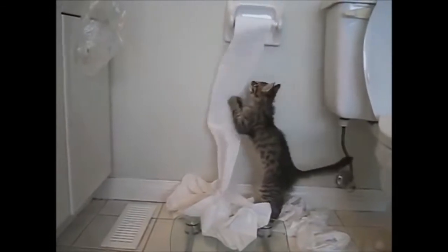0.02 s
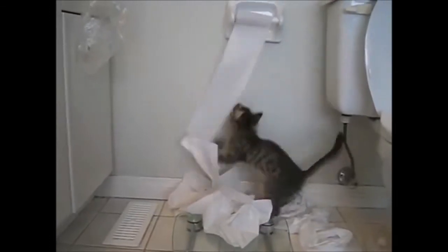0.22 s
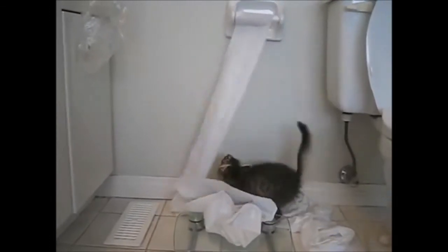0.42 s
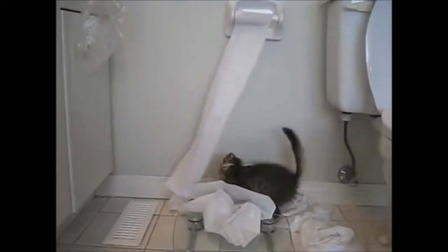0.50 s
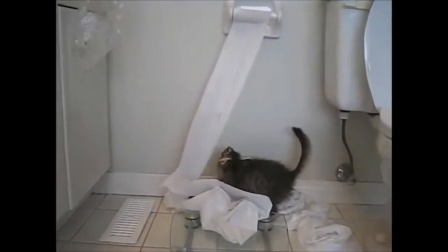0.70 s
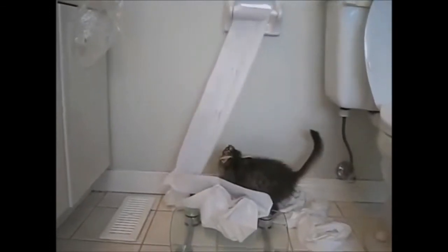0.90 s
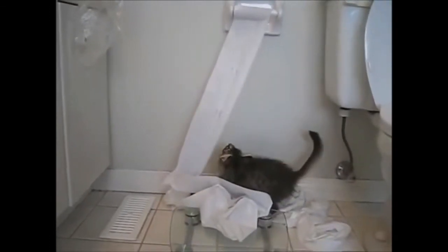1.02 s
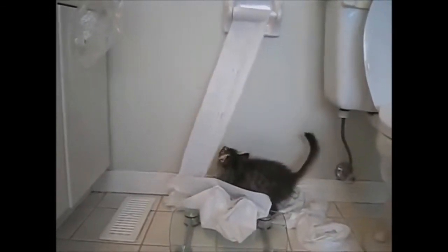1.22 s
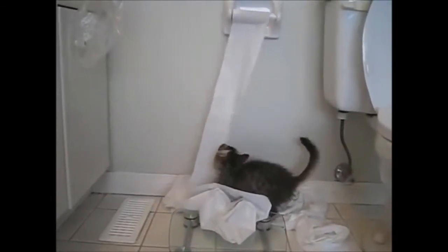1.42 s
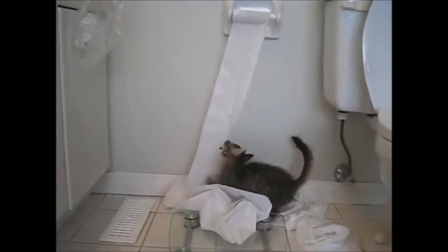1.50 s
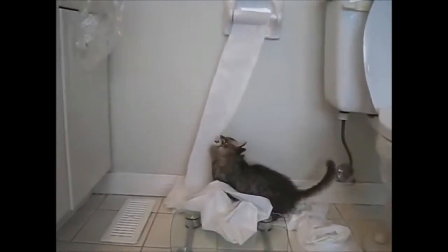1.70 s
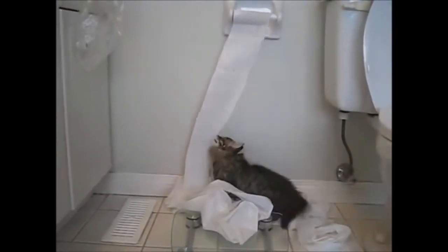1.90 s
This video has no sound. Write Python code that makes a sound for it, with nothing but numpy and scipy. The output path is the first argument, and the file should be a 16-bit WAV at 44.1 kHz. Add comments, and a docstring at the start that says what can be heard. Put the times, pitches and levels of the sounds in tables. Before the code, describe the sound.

Light clicks, then a hard burst of holder clatter with rustling paper and a dull bump, quickly dying to quiet room hiss; later one soft paper swish and tiny crease pops, slightly echoing tiled room.

```python
"""Kitten yanking paper off a roll

In a small tiled bathroom the spindle knocks, rattles and whirs in its wall holder (struck modes, narrow noise)
while the sheet rushes and rustles (coloured noise, crackle, pitched grains) and the tug thuds low.
Later the paper swishes once more and rustles softly on, creases popping as short sines.
Feedback delays give the room its ring; steady hiss and hollow hums lie beneath."""
import sys
import numpy as np
from scipy import signal
from scipy.fft import rfft, irfft, next_fast_len
from scipy.io import wavfile
from scipy.ndimage import uniform_filter1d

SR = 44100
rng = np.random.default_rng(int(sys.argv[2]) if len(sys.argv) > 2 else 0)


def output_pcm(signal):
    """Save a mono or channel-first signal as 16-bit PCM at the path in sys.argv[1].

    Samples are clipped to [-1, 1] before scaling.
    """
    pcm = np.clip(np.atleast_2d(signal).T, -1, 1) * 32767
    wavfile.write(sys.argv[1], SR, np.round(pcm).astype(np.int16))


def decibels_to_gain(level_db):
    """Convert a level in decibels to a linear amplitude gain (20 dB per decade)."""
    exponent = np.asarray(level_db, float) / 20
    return 10 ** exponent


N = 85995   # samples

# Spindle knocks in the holder. Each row: start in seconds, strength in dB, loudest pitch in Hz,
# contact length in seconds, spread of pitch in octaves.
KNOCK_ROWS = [(.0005, -41.5, 4420, 0.0034, .4), (0.0182, -31.5, 3680, 0.009, 0.37),
              (0.0853, -24, 1400, 0.0076, 0.2), (0.097, -26, 1880, 0.008, 0.18),
              (0.1318, -22.5, 4020, 0.0039, 0.7), (0.1853, -27, 2980, 0.0035, 1.15),
              (0.2318, -19.5, 4200, 0.0035, 0.65), (0.2349, -25, 1300, 0.0071, 0.39),
              (0.244, -24.5, 4940, 0.0033, 0.25), (0.2612, -8, 4100, 0.0041, 0.33),
              (0.281, -15, 4570, 0.0034, 0.54), (0.295, -21, 5600, 0.0022, 0.44),
              (0.3047, -4, 3430, 0.0042, 0.38), (0.3186, -15, 4840, 0.004, 0.29),
              (.3190, -14.5, 1130, 0.006, 0.2), (.3380, -7.5, 2550, 0.001, 0.94),
              (.3445, -16, 1300, 0.0017, 0.29), (0.36, -29, 4600, 0.00086, 0.19),
              (0.372, -14, 4560, 0.0039, 0.17), (0.386, -22.5, 4000, 0.002, .3),
              (0.397, -13, 1060, 0.0012, 0.32), (0.417, -16, 4600, 0.00073, .6),
              (0.453, -24, 5100, 0.0016, 0.31)]
# Holder and spindle modes. Each row: pitch in Hz, relative level in dB, undamped t60 in seconds.
HOLDER_MODES = [(604.6, -6, 0.076), (969, -6.5, 0.078), (1170, -7.5, 0.055), (1300, 2, 0.023),
                (1418, -2, 0.044), (1800, 0, 0.02), (2254, -11.5, 0.014), (2510, -1, 0.024),
                (2786, -5.5, 0.023), (3430, -19, 0.035), (3908, 3, 0.012), (4476, 2, 0.0067),
                (5070, 5, 0.0067), (6000, 3.5, 0.0058), (8700, -56, .012), (10600, -17, 0.0084)]
# Rattle of the spinning roll. Each row: time in seconds, relative level in dB.
RATTLE_LEVEL = [(0, -45), (.05, -45.5), (.1, -42), (.2, -41), (.24, -45), (.29, -30.5), (.315, -25.5),
                (.35, -25), (.41, -31), (.47, -38.5), (.56, -44.5), (.65, -75), (.75, -68)]
# Whir of the roll's tube on its spindle. Each row: time in seconds, level in dB.
WHIR_LEVEL = [(0, -51.5), (.05, -54), (.09, -54), (.15, -46.5), (.22, -52), (.245, -42), (.29, -42),
              (.32, -48), (.36, -67)]
# Paper movement. Each row: time in seconds, level in dB.
PAPER_LEVEL = [(0, -55), (.012, -54), (.075, -58.5), (.11, -52.5), (.135, -43.5), (.17, -43.5),
               (.222, -46.5), (.234, -38.5), (.27, -38), (.295, -27.5), (.33, -29), (.40, -32.5),
               (.445, -31.5), (.47, -41.5), (.54, -54), (.62, -54.5), (.69, -57), (.72, -62), (1.0, -67.5),
               (1.225, -70), (1.24, -54.5), (1.275, -52.5), (1.284, -48), (1.3, -47), (1.325, -45),
               (1.35, -47), (1.385, -51.5), (1.42, -57), (1.6, -56.5), (1.95, -58.5), (2.0, -59)]
# Paper spectrum. Each row: frequency in Hz, relative density in dB per Hz.
PAPER_SPECTRUM = [(250, -23), (450, -4), (900, -6), (1300, -3.5), (1900, -1), (3600, -2.5), (4800, -2),
                  (6850, -7), (11800, -11.5), (15800, -20)]
# Single creases popping. Each row: start in seconds, strength in dB, pitch in Hz, t60 in seconds.
CREASE_POPS = [(0.158, -35.5, 3250, 0.057), (1.168, -36, 1300, .01), (1.281, -38, 2880, 0.018),
               (1.4850, -43, 3450, 0.013), (1.6210, -38, 3650, .01), (1.6296, -33, 4340, 0.0071),
               (1.695, -43.5, 2620, 0.016), (1.8480, -48, 1010, 0.0072)]
# Low shaking of wall and floor. Each row: time in seconds, relative level in dB.
THUD_LEVEL = [(0.0, -57.5), (0.172, -54), (0.314, -43), (0.492, -44), (0.514, -50), (0.65, -61),
              (0.688, -92), (0.77, -57), (0.8, -64)]
# Thud spectrum. Each row: frequency in Hz, relative density in dB per Hz.
THUD_SPECTRUM = [(40, -22), (70, -7.5), (120, -11), (200, 0.5), (300, -9.5), (450, -4), (650, -43),
                 (1100, -45)]
# Boomy resonance of the thud. One row: pitch in Hz, width in Hz, level against the lumpy noise in dB.
THUD_RESONANCE = (160, 45, -2.5)
# Room hiss spectrum. Each row: frequency in Hz, relative density in dB per Hz.
AIR_SPECTRUM = [(20, 7), (40, -4.5), (200, -4), (300, -10), (540, -7), (800, -8.5), (1100, -8),
                (1470, -11.5), (2400, -15), (7800, -21), (15800, -28)]
# Hollow room hums. Each row: pitch in Hz, width in Hz, level in dB.
ROOM_HUMS = [(303.6, 71, -66.5), (911.5, 121, -63.5), (1134, 110, -69.5), (7940, 81, -81.5)]

TOUCH_GAP_S = 0.001   # nominal, between touches within one knock
SKIRT_DB = -18   # floor for modes far from a knock's pitch
SNAP_DB, SNAP_DECAY_S = -10.5, 0.0025   # noisy snap at the start of a knock
RATTLES_PER_S, RATTLE_SPREAD_DB = 3000, 2.5
RATTLE_TILT_DB_PER_OCTAVE, RATTLE_T60_SHARE = -3.5, 0.38   # tilt about 1 kHz; t60 left while rubbing
GRAINS_PER_S, GRAIN_SPREAD_DB = 3300, 2.5
CRACKLE_HALF_DB, CRACKLE_SHARE = -42, 0.45   # paper level at half share; share of power at full speed
PITCHED_DB, PITCHED_T60_CYCLES = -4.5, 16
FLUTTER_DB = 1.8   # of fast-moving paper
HUM_STEADINESS = 0.3   # 0 leaves the swelling, 1 evens it out
ROOM_T60_S, WALL_CUT_HZ, ROOM_DB = 0.6, 5600, -22.5


def rms_one(x):
    """Scale to rms 1."""
    return x / np.sqrt(np.mean(x ** 2) + 1e-20)


def envelope(rows):
    """Gain over time from (s, dB) rows; drops 23 dB within 0.092 s after the last row, then holds."""
    time_s, db = np.transpose(rows)
    time_s = np.append(time_s, time_s[-1] + 0.092)
    db = np.append(db, db[-1] - 23)
    return decibels_to_gain(np.interp(np.arange(N) / SR, time_s, db))


def filtered(x, order, cut_hz, kind):
    """Butterworth filter."""
    return signal.sosfilt(signal.butter(order, cut_hz, kind, fs=SR, output="sos"), x)


def drift(corner_hz):
    """Slow random wander of spread 1: noise through two equal poles, at SR / 40."""
    r = np.exp(-80 * np.pi * corner_hz / SR)
    noise = rng.standard_normal(N // 40 + 2002)
    slow = signal.lfilter([1], [1, -2 * r, r * r], noise)[2000:]
    return np.interp(np.arange(N) / 40, np.arange(len(slow)), rms_one(slow - slow.mean()))


def ring(clicks, hz, t60_s):
    """Two-pole resonance: a unit click starts a decaying sine of height 1."""
    r, w = decibels_to_gain(-60 / (t60_s * SR)), 2 * np.pi * hz / SR
    return signal.lfilter([0, np.sin(w)], [1, -2 * r * np.cos(w), r * r], clicks + 1e-18)


def hollow(hz, width_hz, steadiness):
    """Noise twice through one resonance, its swelling partly evened out; rms 1."""
    t60_s = np.log(1000) / (np.pi * width_hz)
    noise = rng.standard_normal(N + 4000)
    tone = ring(ring(noise, hz, t60_s), hz, t60_s)[4000:]
    swelling = np.abs(signal.hilbert(tone)) + 0.1 * tone.std()
    return rms_one(tone / swelling ** steadiness)


def grains(per_s, spread_db):
    """Random clicks of uneven size and either sign."""
    sizes = decibels_to_gain(spread_db * np.minimum(rng.exponential(1, N), 5)) * rng.choice([-1, 1], N)
    return sizes * (rng.random(N) < per_s / SR) + 1e-18


def colour(sources, spectrum, patchy_db):
    """Third-octave bands dealt in turn from two sources, each flickering a little; rms 1."""
    out, edges = 0, 25 * 2 ** (np.arange(29) / 3)
    hz, db = np.transpose(spectrum)
    for k, (low, high) in enumerate(zip(edges, edges[1:])):
        band = filtered(sources[k % 2], 2, [low, high], "band")
        band_db = np.interp(np.log(low * high) / 2, np.log(hz), db)
        out = out + band * decibels_to_gain(band_db + patchy_db * drift(11.5))
    return rms_one(out)


def snaps(start_index, db, pitch_hz):
    """Decaying noise bursts with a soft onset of 24 samples, stronger for higher knocks."""
    starts = np.zeros(N)
    starts[start_index] = decibels_to_gain(db + SNAP_DB) * pitch_hz / 4000
    decay = signal.lfilter([1], [1, -np.exp(-1 / (SNAP_DECAY_S * SR))], starts + 1e-18)
    burst = uniform_filter1d(decay, size=24, origin=11) * rng.standard_normal(N)
    return filtered(burst, 2, [2000, 11000], "band")


def holder():
    """Knocks, each a few quick touches, and a dense rattle ring the same modes."""
    start_s, db, pitch_hz, length_s, spread_oct = np.transpose(KNOCK_ROWS)
    after_s = TOUCH_GAP_S * np.arange(7) * rng.uniform(0.58, 1.15, (len(start_s), 7))
    fade = np.exp(-(after_s / length_s[:, None]) ** 2 * 2)
    rise = np.minimum(0.47 + after_s / TOUCH_GAP_S / 2, 1)
    touch = decibels_to_gain(db)[:, None] * fade * rise
    at = ((start_s[:, None] + after_s) * SR).astype(int)
    knocks, rattle = snaps(at[:, 0], db, pitch_hz), 0
    shaking = grains(RATTLES_PER_S * (1 + 0.72 * np.tanh(drift(40))), RATTLE_SPREAD_DB)
    for hz, mode_db, t60_s in HOLDER_MODES:
        near = np.exp(-(np.log2(hz / pitch_hz) / spread_oct) ** 2) + decibels_to_gain(SKIRT_DB)
        hit = touch * near[:, None] * decibels_to_gain(mode_db - 12.5 + rng.normal(0, 0.6, touch.shape))
        # touches of a knock share a phase, loosely
        phase = 2 * np.pi * hz * after_s + 2 * np.pi * rng.random((len(start_s), 1))
        phase = phase + rng.normal(0, 1.0, touch.shape)
        pushes = np.zeros(N, complex)
        np.add.at(pushes, at, hit * np.exp(1j * phase))
        pole = decibels_to_gain(-60 / (t60_s * SR)) * np.exp(2j * np.pi * hz / SR)
        knocks += signal.lfilter([1], [1, -pole], pushes + 1e-18).imag
        rubbing = ring(shaking * rng.standard_normal(N), hz, t60_s * RATTLE_T60_SHARE)
        rattle = rattle + decibels_to_gain(mode_db + RATTLE_TILT_DB_PER_OCTAVE * np.log2(hz / 1000)) * rubbing
    body = knocks + decibels_to_gain(-5.5) * envelope(RATTLE_LEVEL) * rms_one(rattle)
    return filtered(body, 2, 240, "high")


def whir():
    """Narrow wavering noise resonance while the roll turns."""
    return envelope(WHIR_LEVEL) * hollow(1390, width_hz=80, steadiness=0.25)


def paper():
    """Sliding hiss, with broad crackle and small pitched grains that grow with the movement."""
    moving = envelope(PAPER_LEVEL)
    crackle = rms_one(grains(GRAINS_PER_S * decibels_to_gain(5.5 * drift(60)), GRAIN_SPREAD_DB))
    share = CRACKLE_SHARE * moving / (moving + decibels_to_gain(CRACKLE_HALF_DB))
    hiss = np.sqrt(1 - share) * rng.standard_normal((2, N))
    sheet = colour(hiss + np.sqrt(share) * crackle * [[1], [-1]], PAPER_SPECTRUM, patchy_db=1.5)
    small = grains(900 * decibels_to_gain(4 * drift(25)), 3.4)
    dealt = rng.integers(0, 16, N)   # which of 16 pitches each grain rings
    pitched = 0
    for k, hz in enumerate(np.geomspace(1700, 7000, 16)):
        pitched = pitched + ring(small * (dealt == k), hz, PITCHED_T60_CYCLES / hz)
    pitched = decibels_to_gain(PITCHED_DB) * np.sqrt(share + 0.21) * rms_one(pitched)
    flutter = decibels_to_gain(FLUTTER_DB * share / CRACKLE_SHARE * drift(79))
    return flutter * moving * (sheet + pitched)


def pops():
    """Each crease rings briefly at its own pitch, with a soft start."""
    t, out = np.arange(N) / SR, 0
    for start_s, db, hz, t60_s in CREASE_POPS:
        after_s = np.abs(t - start_s)
        shape = (t > start_s) * np.tanh(after_s * hz / 3) * decibels_to_gain(-60 * after_s / t60_s)
        out = out + decibels_to_gain(db) * shape * np.sin(2 * np.pi * hz * t)
    return out


def thud():
    """Lumpy low noise with one boomy resonance."""
    hz, width_hz, db = THUD_RESONANCE
    lumpy = colour(rng.standard_normal((2, N)), THUD_SPECTRUM, patchy_db=0.5)
    low = lumpy + decibels_to_gain(db) * hollow(hz, width_hz, HUM_STEADINESS)
    return decibels_to_gain(-2.5) * envelope(THUD_LEVEL) * rms_one(low)


def bathroom(x):
    """Ten feedback delays of alternating sign, duller on every round."""
    size = next_fast_len(N + SR)
    w = 2 * np.pi * np.arange(size // 2 + 1) / size
    dull = 1 / (1 + 1j * w * SR / (2 * np.pi * WALL_CUT_HZ)) ** 0.43
    response = 0
    for k, lag_s in enumerate(rng.uniform(0.009, 0.04, 10)):
        loop = decibels_to_gain(-60 * lag_s / ROOM_T60_S) * dull * np.exp(-1j * w * lag_s * SR)
        response = response + (-1) ** k * loop / (1 - loop)
    return irfft(rfft(x, size) * response, size)[:N]


def air():
    """Steady, slightly flickering room hiss with a few hollow hums of resonant noise."""
    out = decibels_to_gain(-62.5) * colour(rng.standard_normal((2, N)), AIR_SPECTRUM, patchy_db=1.2)
    for hz, width_hz, db in ROOM_HUMS:
        out = out + decibels_to_gain(db) * hollow(hz, width_hz, HUM_STEADINESS)
    return out


def scene():
    """Everything near the roll sounds into the tiled room, over the air."""
    near = holder() + whir() + paper() + pops() + thud()
    return (near + decibels_to_gain(ROOM_DB) * bathroom(near) + air())[None]


def band_limit(x):
    """A steep low-pass at the top of the band."""
    return signal.sosfilt(signal.butter(12, 16300, fs=SR, output="sos"), x)


def record(dry):
    """A small microphone with a steep top cut."""
    top_cut = signal.cheby2(10, 50, 16350, fs=SR, output="sos")
    mix = signal.sosfilt(top_cut, dry)
    return band_limit(mix)


dry = scene()
out = record(dry)
output_pcm(out)
```